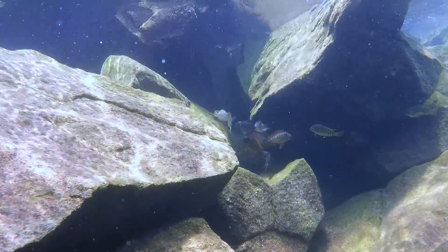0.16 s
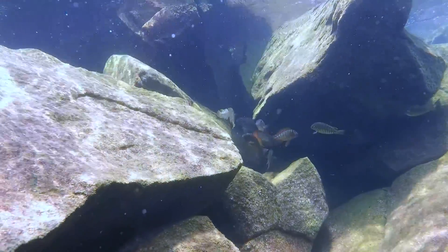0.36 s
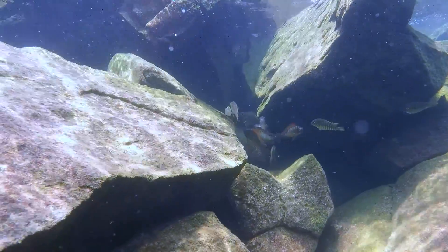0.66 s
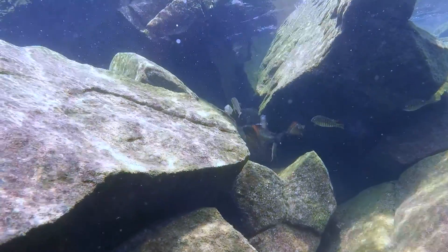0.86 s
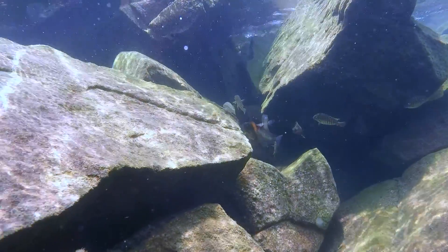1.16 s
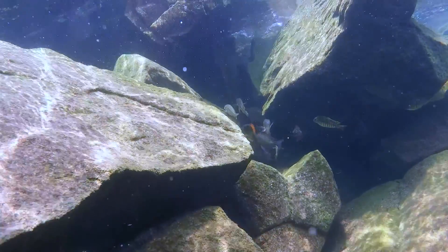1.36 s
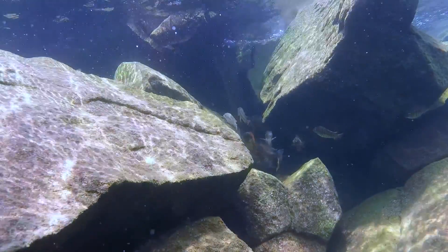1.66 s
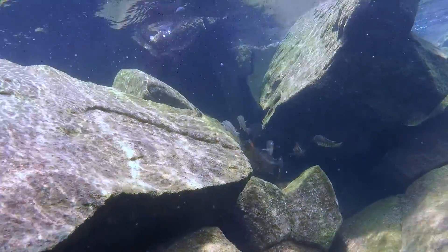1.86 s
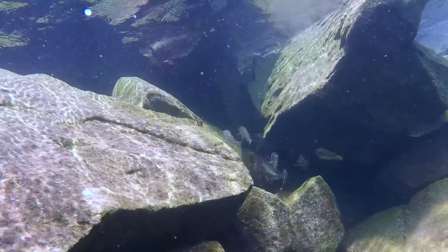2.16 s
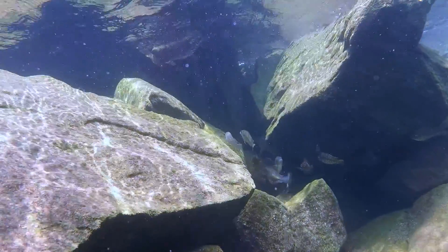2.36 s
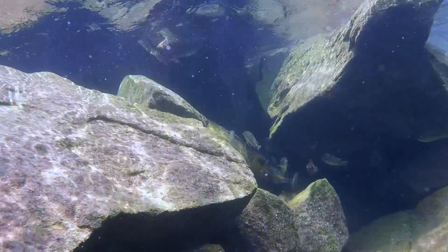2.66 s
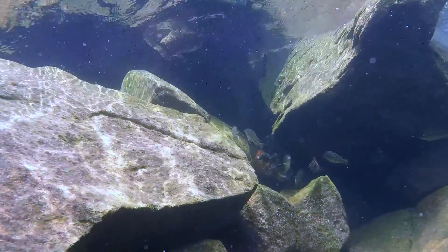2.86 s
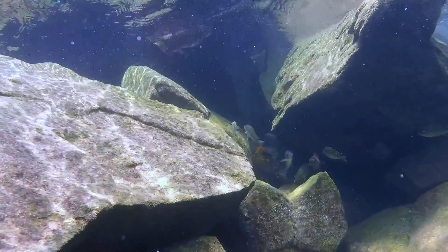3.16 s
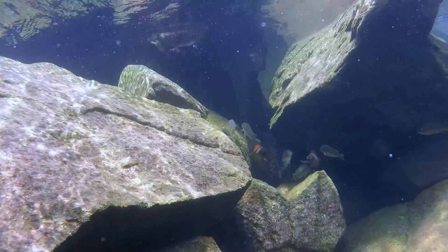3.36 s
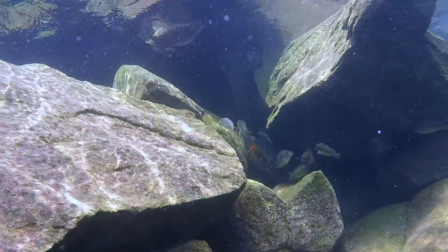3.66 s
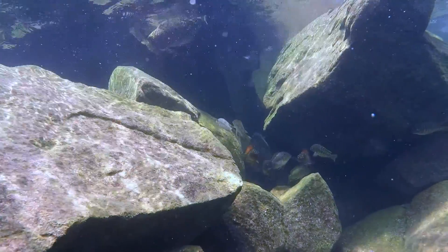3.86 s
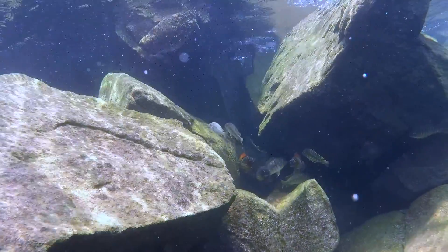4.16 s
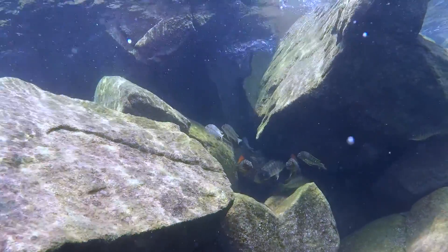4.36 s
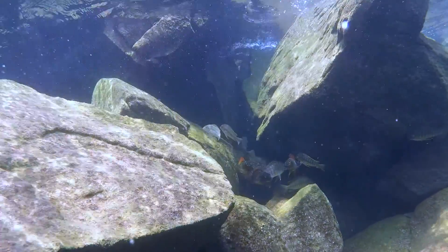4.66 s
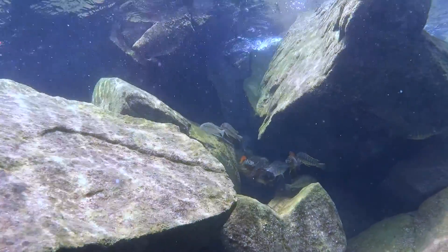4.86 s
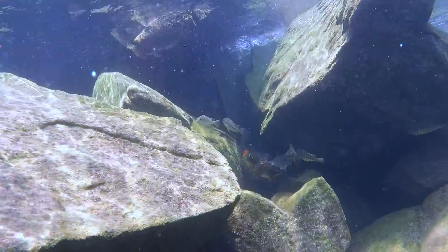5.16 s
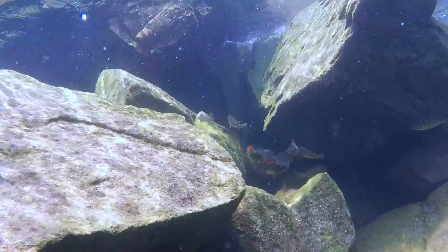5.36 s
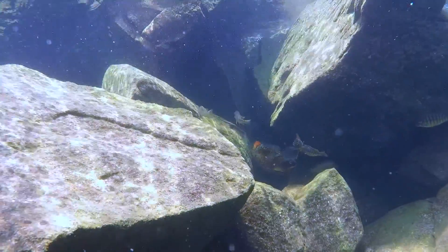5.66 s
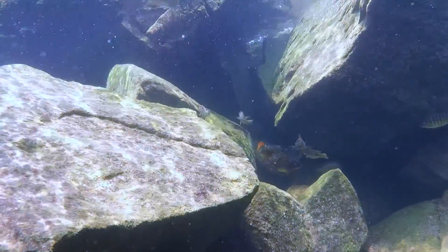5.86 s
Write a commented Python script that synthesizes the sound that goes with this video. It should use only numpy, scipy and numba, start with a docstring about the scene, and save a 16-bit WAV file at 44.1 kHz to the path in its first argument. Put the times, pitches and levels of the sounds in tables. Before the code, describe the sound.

A submerged microphone hears small bubbles plinking and gurgling between rocks, punctuated by booming air-pocket gulps and dull low shoves of water.

```python
"""Among rocks in shallow lake water: small waves wash, heard by a camera under the surface.
Trapped air rings as gliding, decaying sines: small bubbles plink, large pockets gulp and knock.
Surges thump the housing as low decaying sines; behind them are random faint bubbles,
a slow swell and a thin hiss of shaped noise. A limiter ducks the peaks and recovers slowly."""
import sys
import numpy as np
from scipy import signal
from scipy.fft import rfft, irfft
from scipy.io import wavfile
from numba import njit

SR = 44100
rng = np.random.default_rng(int(sys.argv[2]) if len(sys.argv) > 2 else 0)


def master_out(mix):
    """Clip the mix to full scale and print it as 16-bit PCM to the path in sys.argv[1]."""
    frames = np.transpose(np.atleast_2d(mix))
    ceiling = np.clip(frames, -1, 1)
    pcm = np.round(ceiling * 32767).astype(np.int16)
    wavfile.write(sys.argv[1], SR, pcm)


N = 265923
T = np.arange(N) / SR


def undb(db):
    """Convert dB to an amplitude factor."""
    return 10 ** (np.asarray(db) / 20)


def level(x, db):
    """Normalize to unit rms, then apply a fixed or time-varying level."""
    return x * undb(db) / np.sqrt(np.mean(x ** 2))


def add(out, start_s, sound):
    """Mix a sound in at its start time, cut at the end of the scene."""
    i = int(max(start_s, 0) * SR)
    out[i:i + len(sound)] += sound[:max(N - i, 0)]


def walk(rate_hz):
    """Random wander: Gaussian points joined by straight lines, spread near 1."""
    return 1.2 * np.interp(T * rate_hz, np.arange(1024), rng.standard_normal(1024))


def noise(points):
    """Gaussian noise shaped by (frequency [Hz], relative level [dB]) points over log frequency."""
    hz, db = np.transpose(points)
    bins_hz = np.maximum(np.arange(N // 2 + 1) * SR / N, 1)
    shape = undb(np.interp(np.log(bins_hz), np.log(hz), db))
    return irfft(rfft(rng.standard_normal(N)) * shape, N)


def decay(t, t60):
    """Exponential decay, 60 dB down after t60."""
    return np.exp(-np.log(1000) * t / t60)


def ring(hz, t60, glide, base_rise_s, sings=False):
    """Trapped air pulsates: it swells as the pocket closes, then decays while its pitch glides and settles."""
    # a singing bubble keeps a soft, longer ring once its first strong swing is spent
    afterring_db, stretch, longest_s = -12.5, 3.2, 0.51
    last_t60 = max(t60, min(t60 * stretch, longest_s)) if sings else t60
    t = np.arange(int(1.5 * last_t60 * SR)) / SR
    # glide = share of pitch gained over one t60
    phase = 2 * np.pi * hz * np.cumsum(1 + glide * np.minimum(t / t60, 1)) / SR
    rise_s = base_rise_s + 0.042 * t60  # longer rings swell more slowly
    swelling = 1 - np.exp(-(t / rise_s) ** 2)
    afterring = sings * undb(afterring_db) * decay(t, last_t60)
    envelope = np.hypot(decay(t - rise_s, t60), afterring)
    return swelling * envelope * np.sin(phase)


def rings(table, base_rise_s):
    """Sum pulsations: (time [s], pitch [Hz], level [dB], t60 [s], glide [share of pitch])."""
    out = np.zeros(N)
    for start_s, hz, db, t60, glide in table:
        add(out, start_s, undb(db) * ring(hz, t60, glide, base_rise_s))
    return out


def alike(table, glide, base_rise_s):
    """Sum pulsations (time [s], pitch [Hz], level [dB], t60 [s]) that share one glide."""
    return rings([(*row, glide) for row in table], base_rise_s)


def swarm(sizes, spread_db, cycles, count):
    """Bubbles at random moments, most faint and a few louder; each takes the given cycles to decay 60 dB."""
    out = 0
    for hz, width, db in sizes:
        when, luck = rng.random((count, 2)).T
        pitch_hz = hz * np.exp(width * np.clip(rng.standard_normal(count), -2.2, 2.2))
        relative_db = spread_db * np.minimum(-np.log(luck), 3)
        rows = zip(when * N / SR, pitch_hz, relative_db, cycles / pitch_hz)
        out = out + level(alike(rows, glide=0.096, base_rise_s=0.0034), db)
    return out


def strays(hz, width, spread_db, cycles, count):
    """Little bubbles pinch off nearby at random moments; each takes the given cycles to decay 60 dB."""
    when, size, weakness = rng.random((count, 3)).T
    pitch_hz = hz * np.exp(width * (2 * size - 1))
    rows = zip(when * N / SR, pitch_hz, -spread_db * weakness, cycles / pitch_hz)
    return alike(rows, glide=0.022, base_rise_s=0.0022)


def wash():
    """Water working along the rocks keeps shedding faint bubbles, a few of them close by."""
    # how busy the wash is: (time [s], large faint bubbles [dB], small faint bubbles [dB])
    activity = [(0.0, -39, -51.5), (0.4, -37, -46), (1.24, -35.5, -45), (1.41, -36.5, -42),
                (1.61, -39.5, -50.5), (1.81, -32, -38.5), (1.96, -31, -43.5), (2.23, -32.5, -42),
                (2.6, -36.5, -43), (2.82, -38.5, -46), (3.12, -37, -42.5), (3.83, -39, -46.5),
                (4.26, -39, -46.5), (4.7, -38.5, -46.5), (4.82, -51.5, -42.5), (5.06, -38, -52.5),
                (5.2, -43, -46.5), (5.3, -42, -43.5), (5.45, -35, -44.5), (6.03, -36.5, -49.5)]
    # spread of the large bubbles: (middle pitch [Hz], width [log pitch], relative level [dB])
    large_sizes = [(311.6, 0.1645, 5), (184.3, 0.27, -1.5)]
    # spread of the small bubbles: (middle pitch [Hz], width [log pitch], relative level [dB])
    small_sizes = [(885.6, .09, -5.5), (1357.5, .16, -5.5)]
    near_over_small_db = 6  # loudest nearby plinks
    times_s, *columns = np.transpose(activity)
    large_db, small_db = (np.interp(T, times_s, column) for column in columns)
    large = level(swarm(large_sizes, spread_db=2.0, cycles=38.5, count=800), large_db)
    small = level(swarm(small_sizes, spread_db=2.5, cycles=60.5, count=800), small_db)
    near = strays(hz=1240, width=0.47, spread_db=12.5, cycles=24, count=40)
    return large + small + near * undb(small_db + near_over_small_db)


def swell():
    """Slow swell: low-frequency noise whose level wanders."""
    # swell spectrum: (frequency [Hz], relative density [dB per Hz])
    spectrum = [(4, -8.5), (11, 4.5), (20, -5), (38, -11.5), (60, -17.5), (110, -28), (200, -35),
                (500, -61)]
    return level(noise(spectrum) * undb(walk(rate_hz=4)), db=-21.5)


def hiss():
    """Thin hiss: broad noise whose level flutters slightly."""
    # hiss spectrum: (frequency [Hz], relative density [dB per Hz])
    spectrum = [(100, -0.5), (500, 2), (750, -1.5), (1100, -3), (2000, -2.5), (3000, -5.5), (4500, -10),
                (7500, -14)]
    return level(noise(spectrum) * undb(0.5 * walk(rate_hz=17)), db=-40.5)


def bubbles():
    """Clear bubbles plink, many bending in pitch as they move; the large ones sing on softly."""
    # bubbles that stand out: (time [s], pitch [Hz], level [dB], t60 [s], glide [share of pitch per t60])
    clear = [ (0.045, 1005, -13.5, 0.062, -0.017), (0.049, 382.7, 1.5, 0.043, 0.1),
             (.064, 430, -9.5, 0.07, 0.033), (.071, 4600, -33, .01, 0), (.2, 295, -24, 0.22, -0.15),
             (0.227, 923, -18.5, 0.031, -0.027), (0.343, 905, -13.5, 0.029, -0.036),
             (0.359, 352, -21.5, 0.059, 0.022), (0.42, 1026, -25, 0.037, -0.12), (.419, 1400, -31, .02, 0),
             (.463, 980, -22, .07, -0.031), (0.476, 945, -15, 0.087, -0.022),
             (0.494, 995, -22, .035, -0.067), (.474, 318, -15, 0.016, -0.057),
             (.475, 1380, -19, 0.042, -0.2), (.476, 654, -21, 0.05, 0.018), (.495, 385, -21, .025, 0),
             (.497, 710, -20, 0.051, -0.14), (0.509, 1304, -24, 0.041, 0.038),
             (.503, 830, -22, .04, -0.085), (.515, 920, -15, 0.038, 0.026), (.519, 637, -25.5, 0.11, .1),
             (.538, 930, -31.5, 0.067, -0.097), (.517, 299.5, -14.5, 0.119, 0.28),
             (.615, 1030, -34, 0.047, -0.13), (0.738, 4500, -32, .011, 0), (0.794, 298, -26, 0.064, 0.46),
             (.822, 870, -31.5, 0.085, -0.2), (.854, 844, -29, 0.05, 0.0056),
             (.956, 955, -29, 0.042, -0.067), (0.971, 267, -10.5, 0.061, -0.04),
             (.974, 820, -29.5, 0.1, -0.082), (1.15, 233, -24, 0.11, 0.17),
             (1.317, 1394, -17.5, 0.035, -0.068), (1.319, 1190, -22.5, 0.027, 0),
             (1.319, 1012, -29, .02, -0.038), (1.398, 1314, -29, .025, 0), (1.581, 311, -26.5, 0.078, 0.31),
             (1.618, 930, -30.5, 0.036, -.05), (1.779, 346, -23.5, 0.11, 0.00078),
             (1.985, 790, -28, 0.033, 0.22), (2.012, 1310, -27, 0.033, -0.007),
             (2.02, 310, -18.5, 0.055, 0.27), (2.03, 814, -25, 0.068, 0.038),
             (2.118, 282.3, -14, 0.093, 0.86), (2.116, 1572, -31, .022, 0), (2.144, 1390, -26, .016, 0.11),
             (2.145, 1620, -25.5, 0.012, 0.057), (2.178, 920, -22, .04, -0.35),
             (2.185, 244, -14.5, 0.1, -0.027), (2.217, 840, -30, 0.047, -0.051),
             (2.274, 290, -21.5, 0.12, 0.39), (2.292, 907, -16, 0.048, 0.03), (2.293, 1938, -30, .018, 0),
             (2.295, 1378, -30, .018, 0), (2.329, 1780, -25.5, 0.024, 0.12),
             (2.326, 1360, -23, 0.019, 0.035), (2.378, 1357, -30.5, .025, 0.1),
             (2.415, 910, -24.5, .03, -0.13), (2.506, 866, -20.5, 0.071, 0.026),
             (2.506, 345, -18.5, .04, -0.24), (2.52, 1357, -25.5, .022, 0), (2.551, 1335, -24, .024, 0),
             (2.578, 824, -27, 0.061, -0.076), (2.624, 311.5, -17.5, 0.14, -0.29),
             (2.692, 212, -15.5, 0.11, -0.18), (2.730, 1355, -23, 0.037, -0.021),
             (2.782, 305, -15.5, 0.086, -0.12), (2.865, 144, -32.5, 0.57, -0.0043),
             (2.939, 168, -27.5, 0.43, 0.16), (2.953, 1425, -22.5, 0.021, 0.17),
             (2.987, 937, -15.5, 0.033, -0.052), (3.086, 342, -19.5, .12, -0.061),
             (3.086, 937, -11, 0.025, 0.049), (3.114, 1435, -20.5, 0.017, 0),
             (3.163, 1430, -28.5, 0.018, 0), (3.243, 885, -17.5, 0.042, -0.0036),
             (3.270, 297.4, -11.5, 0.13, -0.14), (3.274, 900, -19, 0.026, 0.18),
             (3.276, 1360, -28.5, .04, -0.021), (3.277, 785, -14.5, 0.064, -0.011),
             (3.281, 714, -20.5, 0.084, 0.088), (3.333, 281, -15.5, 0.045, 0),
             (3.345, 295, -11, .07, 0.059), (3.341, 963, -24.5, 0.029, -0.04),
             (3.318, 3000, -31.5, 0.012, 0.081), (3.345, 5750, -32.5, .0078, 0.11),
             (3.352, 885, -29.5, 0.037, -0.19), (3.393, 1360, -26.5, 0.029, -0.0036),
             (3.415, 430, -29, 0.044, 0.075), (3.537, 290.6, -16, 0.21, -0.16),
             (3.541, 1701, -28.5, 0.017, 0), (3.545, 438, -27.5, 0.11, -0.034),
             (3.603, 332, -10.5, 0.091, -0.3), (3.618, 299.7, -11, 0.33, 0.015),
             (3.631, 448, -19, 0.13, -0.12), (3.687, 1410, -29, 0.046, -.05),
             (3.726, 905, -23, .045, -0.08), (3.87, 332, -27, 0.21, 0.14), (3.887, 1156, -24, 0.019, -0.12),
             (3.910, 946, -23, 0.081, -0.045), (4.004, 886, -26.5, 0.06, -0.11),
             (4.029, 1420, -29, 0.029, -0.16), (4.06, 777, -33, 0.14, 0.22),
             (4.10, 256, -26.5, 0.16, -0.049), (4.131, 899, -29, 0.092, 0.15),
             (4.165, 307, -7, 0.022, -0.022), (4.172, 300, -20.5, 0.061, 0),
             (3.981, 603, -30, 0.028, 0.067), (4.166, 1036, -26, 0.073, -0.11),
             (4.220, 3620, -32.5, 0.016, -0.027), (4.237, 1405, -31.5, 0.022, 0),
             (4.365, 1134, -21.5, 0.022, .06), (4.398, 1114, -26, .025, 0),
             (4.472, 1390, -25, 0.026, -0.083), (4.473, 1900, -27.5, 0.016, -0.051),
             (4.506, 287, -17, 0.076, 0.045), (4.543, 282, -20.5, 0.029, 0.22),
             (4.583, 317, -15.5, 0.026, -0.16), (4.66, 893, -22, 0.026, 0.031),
             (4.659, 1320, -24.5, .035, 0.068), (4.672, 865, -22, .028, -0.028),
             (4.678, 1900, -29, 0.022, 0), (4.686, 1320, -12, 0.016, 0.017),
             (4.713, 1350, -20.5, .014, -0.091), (4.718, 770, -20.5, .015, 0.11),
             (4.74, 1760, -24, .03, -.06), (4.773, 990, -20, .03, 0.033),
             (4.849, 1454, -14.5, 0.022, -0.087), (4.882, 1038, -24, 0.021, 0.042),
             (4.966, 1800, -23.5, 0.016, -0.019), (5.045, 390, -23.5, .06, -.05),
             (5.08, 305, -23, 0.097, -.08), (5.1773, 245.2, 2, 0.13, 0.088),
             (5.179, 149, -13, 0.019, -0.33), (5.216, 935, -22.5, 0.065, -0.17),
             (5.287, 362, -13.5, .091, -0.18), (5.302, 290.5, -9, 0.063, -0.1),
             (5.323, 304, -12.5, 0.044, -0.074), (5.32, 1410, -30.5, .035, -0.11),
             (5.330, 960, -14, 0.043, 0.0043), (5.353, 1895, -31, .018, 0), (5.288, 945, -29, .025, 0),
             (5.364, 1395, -23.5, 0.05, -0.06), (5.393, 910, -24, 0.016, 0.25),
             (5.449, 940, -31, 0.039, 0.17), (5.519, 1022, -17, 0.034, -0.19),
             (5.665, 296, -9, 0.066, 0.54), (5.71, 313, -21.5, 0.093, -0.5), (5.79, 1200, -29, 0.027, 0),
             (5.860, 320, -13.5, 0.06, -0.046)]
    sings_below_hz = 600
    out = np.zeros(N)
    for start_s, hz, db, t60, glide in clear:
        sound = ring(hz, t60, glide, base_rise_s=0.0022, sings=hz < sings_below_hz)
        add(out, start_s, undb(db) * sound)
    return out


def gurgles(width, t60, count):
    """Each breaking wavelet sheds a quick crowd of alike, overlapping bubbles."""
    # breaking wavelets: (time [s], length [s], middle pitch [Hz], rms level over the length [dB])
    wavelets = [(.475, 0.058, 710, -36), (.48, 0.028, 267, -25.5), (.474, 0.047, 1245, -39),
                (.82, 0.031, 832, -42), (1.22, 0.071, 130, -31), (2.02, 0.15, 334, -33),
                (2.531, 0.067, 286, -32.5), (3.279, 0.11, 343, -36.5), (3.28, 0.11, 1334, -50),
                (3.598, 0.072, 249, -36), (4.641, 0.045, 1296, -36.5), (5.33, 0.18, 135, -41)]
    out = np.zeros(N)
    for start_s, length_s, hz, db in wavelets:
        when, size = rng.random((count, 2)).T
        times_s = start_s + length_s * when
        pitch_hz = hz * np.exp(width * (2 * size - 1))
        rows = [(s, p, 0, t60) for s, p in zip(times_s, pitch_hz)]
        cloud = alike(rows, glide=0.037, base_rise_s=0.0009)
        out += cloud * undb(db) / np.sqrt(np.sum(cloud ** 2) / (length_s * SR))
    return out


def surges():
    """Surges shove the housing: low thumps that fall in pitch."""
    # shoves: (time [s], pitch [Hz], level [dB], t60 [s])
    shoves = [(.855, 23.1, -5.5, 0.41), (.975, 23.9, -9, 0.65), (2.80, 22, -7.5, 0.13),
              (3.815, 30.9, -10, 0.61), (4.215, 33.2, -8.5, 0.039), (4.340, 33.4, 0, 0.087),
              (4.465, 29.3, 0.5, 0.11), (5.523, 30.5, 0, 0.22), (5.865, 30, -9, 0.18)]
    return alike(shoves, glide=-0.29, base_rise_s=0.0079)


def gulps():
    """A pocket snaps shut, then empties in uneven jolts; each knocks and booms the cavity, mostly falling."""
    # large air pockets snap shut under the rocks: time [s]
    snaps_s = [1.4375, 2.3965, 4.7062]
    # jolts in which the squeezed pockets empty: (time [s], knock pitch [Hz], knock level [dB],
    # cavity delay [s], cavity pitch [Hz], cavity level [dB], cavity t60 [s],
    # cavity glide [share of pitch per t60])
    jolts = [(1.4441, 238.6, 1, 0.01, 123, 1, 0.075, -.05),
             (1.4877, 218, -12.5, -0.000017, 119, -4.5, 0.087, -.03),
             (1.5146, 197, -18, -.0025, 98.4, -4, .13, -0.4),
             (1.544, 227, -18, 0.023, 111, -13, 0.14, -0.4),
             (1.606, 280, -28, .0034, 85, -15.5, .22, -0.29),
             (2.3998, 284, -13.5, .0022, 99, -1.5, 0.082, -0.68),
             (2.415, 203, -7, .0057, 61.7, -1, 0.18, 0.074),
             (2.562, 231, -14, -.014, 85.2, -5.5, 0.14, 0.018),
             (2.602, 255, -19, -0.0187, 68.4, -11.5, 0.24, -0.062),
             (4.7155, 238, 5, 0.013, 106, 3.5, 0.062, -0.33),
             (4.7371, 274, -9.5, .0206, 102.5, -2, 0.17, -0.52),
             (4.799, 239, -11.5, -.027, 93, -1, 0.18, -0.1)]
    neck_hz, neck_db, neck_t60_s = 326, -6.5, 0.03  # the snap as a pocket closes
    knock_t60_s, glide = 0.08, -0.15  # squeezed air; glide shared by snap and knock
    rows = [(s, neck_hz, neck_db, neck_t60_s, glide) for s in snaps_s]
    for start_s, knock_hz, knock_db, cavity_delay_s, *cavity in jolts:
        rows.append((start_s, knock_hz, knock_db, knock_t60_s, glide))
        rows.append((start_s + cavity_delay_s, *cavity))
    return rings(rows, base_rise_s=0.0028)


def crevices(x, t60, wet_db, dull_hz):
    """The lows linger briefly between rocks and surface: low-passed sound through a decaying noise tail."""
    t = np.arange(SR // 3) / SR
    tail = rng.standard_normal(len(t)) * decay(t, t60) * (t > 0.004)
    tail /= np.linalg.norm(tail)
    dull = signal.sosfilt(signal.butter(1, dull_hz, fs=SR, output="sos"), x)
    return x + undb(wet_db) * signal.fftconvolve(dull, tail)[:N]


def scene():
    """Bubbles and gulps among the rocks, over the wash, surges, swell and hiss."""
    air = bubbles() + gurgles(width=0.16, t60=0.048, count=14) + gulps()
    air = crevices(air, t60=0.29, wet_db=-15, dull_hz=700)
    return (wash() + swell() + hiss() + air + surges())[None]


@njit
def duck(over_db, attack, release):
    """Gain reduction in dB: it rises fast with each overshoot and creeps back."""
    out, held_db = np.empty(len(over_db)), 0.
    for i in range(len(over_db)):
        rate = attack if over_db[i] > held_db else release
        held_db += (over_db[i] - held_db) * rate
        out[i] = held_db
    return out


def limiter(x, ceiling_db, attack_s, release_s):
    """Hold the peaks near the ceiling, looking ahead by the attack time."""
    over_db = np.maximum(20 * np.log10(np.abs(x) + 1e-9) - ceiling_db, 0)
    reduction_db = duck(over_db, 1 / (attack_s * SR), 1 / (release_s * SR))
    return x * undb(-np.interp(T + attack_s, T, reduction_db))


def record(dry):
    """The camera limits the peaks, then cuts the top with a steep low-pass."""
    top_hz = 7600
    held = limiter(dry[0], ceiling_db=-7.0, attack_s=0.00044, release_s=0.27)
    low_pass = signal.ellip(12, 0.2, 60, top_hz, fs=SR, output="sos")
    return signal.sosfilt(low_pass, held)[None]


dry = scene()
out = record(dry)
master_out(out)
```